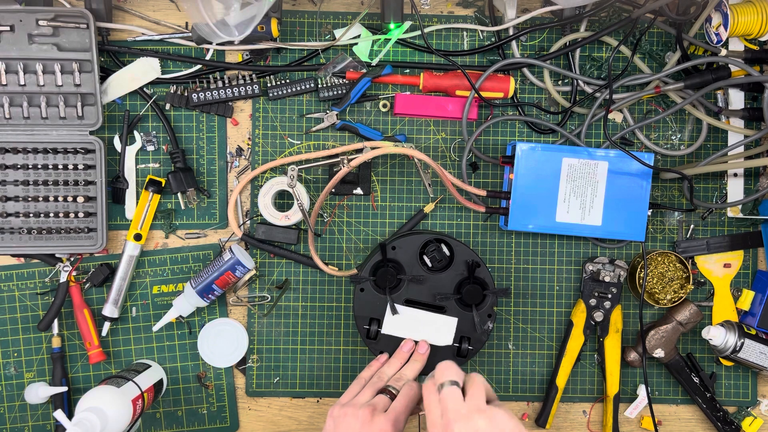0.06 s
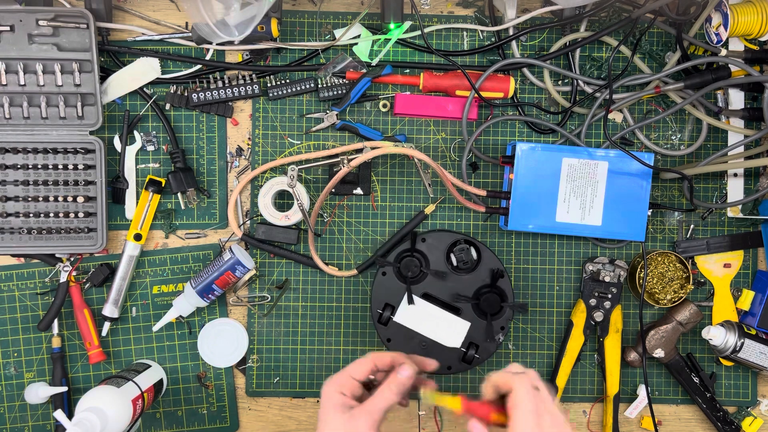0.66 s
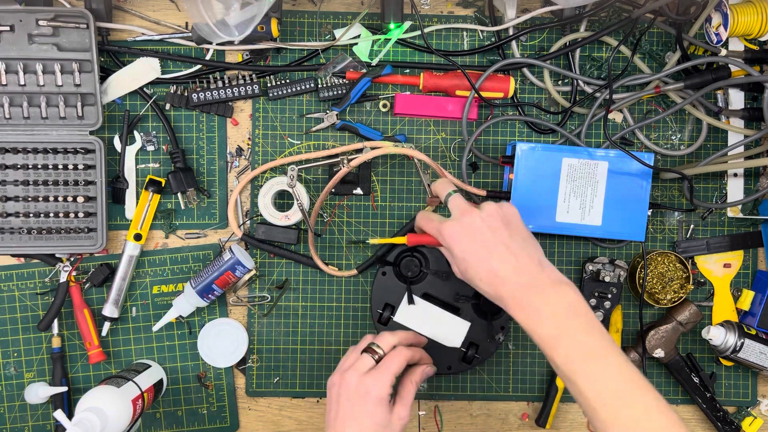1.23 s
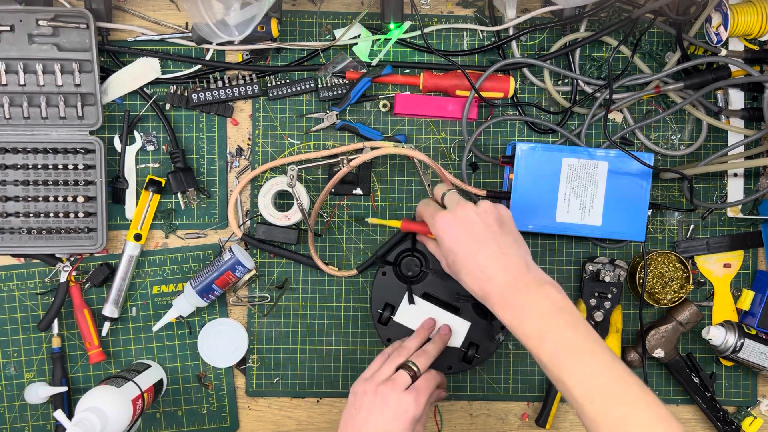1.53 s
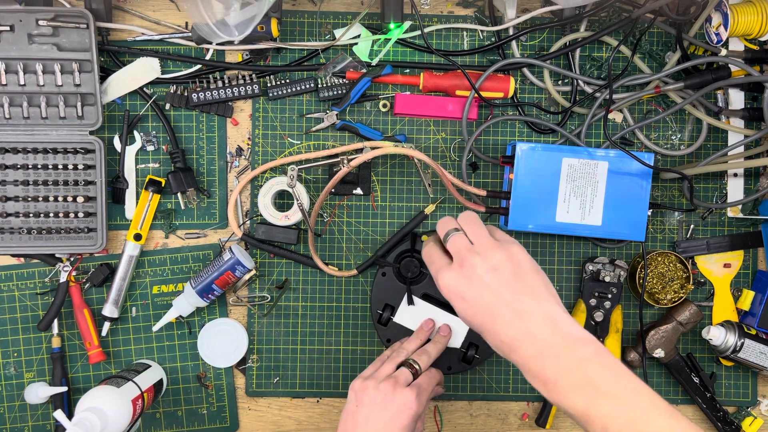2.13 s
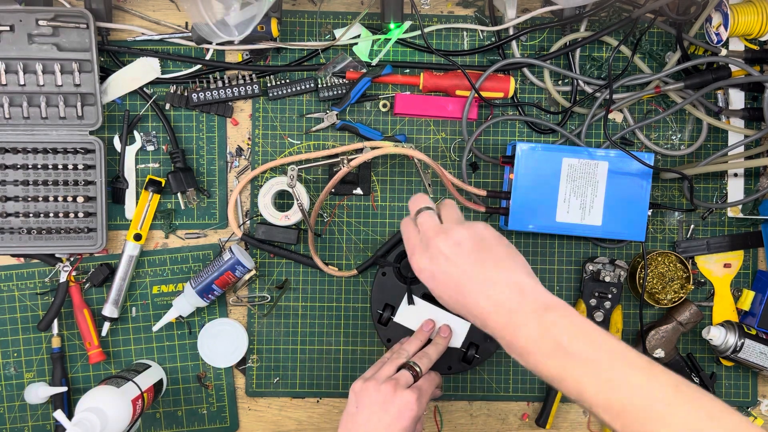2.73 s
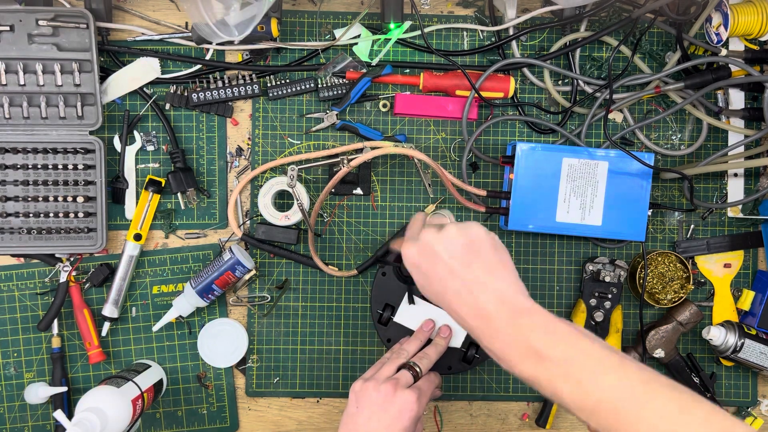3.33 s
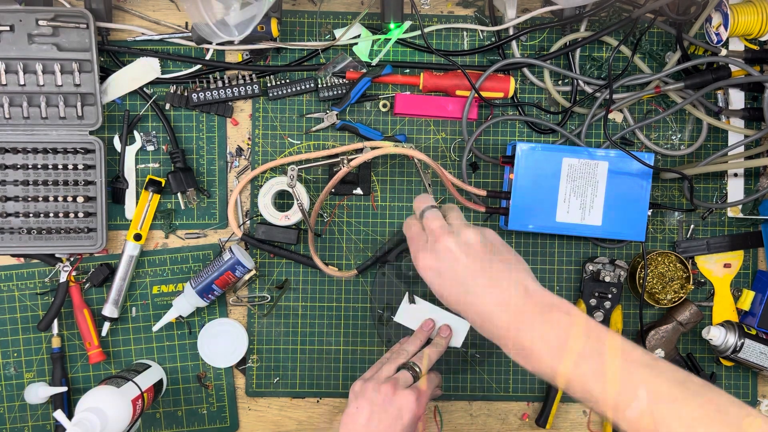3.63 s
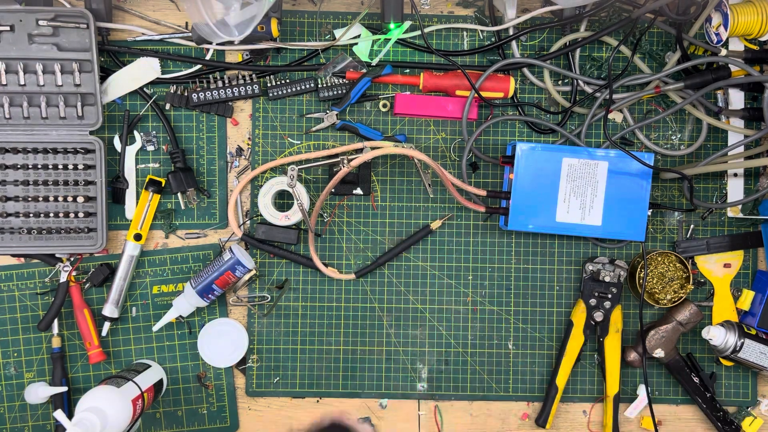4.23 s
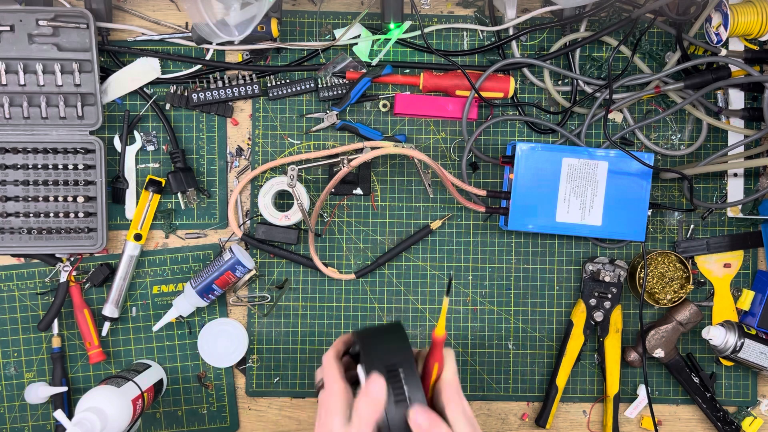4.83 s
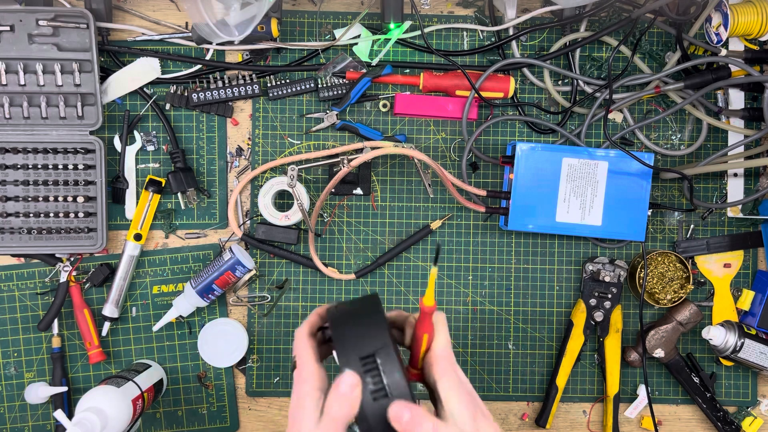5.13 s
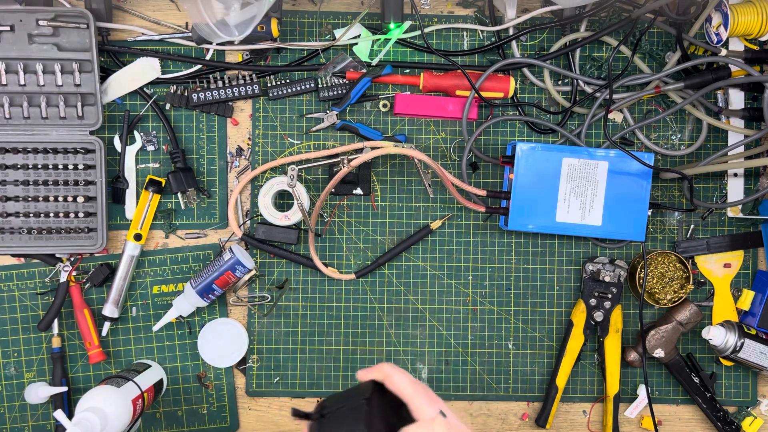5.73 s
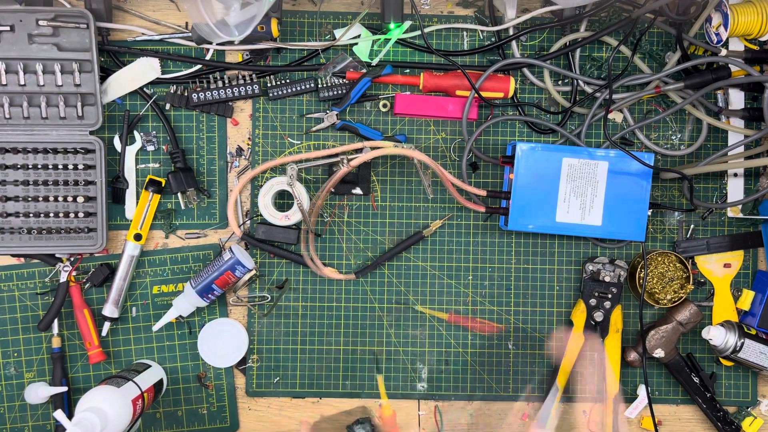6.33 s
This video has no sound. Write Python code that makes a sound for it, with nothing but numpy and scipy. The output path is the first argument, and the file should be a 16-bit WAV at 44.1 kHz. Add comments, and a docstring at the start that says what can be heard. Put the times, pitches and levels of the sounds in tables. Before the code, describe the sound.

A small plastic robot vacuum is handled close by on a workbench, over a quiet rumble of room air. From the start, parts click lightly into the shell while fingers rub and slide on the plastic. A sharp cluster of snaps with a dull bench bump comes at about 0.6 seconds. Lighter clicks follow from 1.3 seconds, building to a firm double snap at 2.5, with more clicks and rubbing until 3.4.

From about 3.6 seconds the unit is turned over, and the air becomes deeper, with a faint hum. Loose parts knock and tumble inside the hollow case in a louder, continuous rattle, strongest between 3.9 and 4.9 seconds, while hands thump softly on it. After 5 seconds the rattle thins into quieter, duller knocks, with one firmer knock near 6.3 and a few small ones up to the end at about 6.5 seconds.

```python
"""In a workshop, over a quiet rumble of air, a small plastic robot vacuum is put together on a bench.
Parts click and snap into its shell, fingers rub and slide on it, and it bumps on the bench.
In a second scene it is turned over: hands thump softly, loose parts knock and rattle in the hollow case,
and the rattle thins out. Each click or knock is a burst of noise that makes the plastic ring;
rubbing and rattling are hundreds of tiny hits a second."""
import sys
import numpy as np
from scipy import signal
from scipy.fft import rfft, irfft
from scipy.io import wavfile

SR = 44100
rng = np.random.default_rng(int(sys.argv[2]) if len(sys.argv) > 2 else 0)


def generate_wav(sig):
    """Save sig (samples, or channels by samples) to the path in sys.argv[1] as 16-bit PCM at SR."""
    pcm = np.round(np.clip(np.atleast_2d(sig).T, -1, 1) * 32767).astype(np.int16)
    wavfile.write(sys.argv[1], SR, pcm)


N = 285327
TIME = np.arange(N) / SR

# Tone of the room air in the fitting scene and in the handling scene: f/Hz, relative level/dB
FITTING_AIR = [(25, -35), (70, -14), (110, -1.5), (240, -5.5), (420, -12.5), (800, -17), (2000, -23),
               (5000, -26), (9500, -30), (15500, -36)]
HANDLING_AIR = [(25, -35), (45, 1), (70, 7), (130, -4.5), (250, -7.5), (600, -11), (2000, -12.5),
                (5000, -38), (10000, -34), (15500, -32)]
# Tones of the room's hum: f/Hz, level/dB
HUM_TONES = [(111, -70.5), (156, -73.5)]

# Overall tone of a hand's thump, skin on plastic, the shell and the held case: f/Hz, relative level/dB
THUMP_TONE = [(90, -18.5), (160, 9.5), (215, -7), (280, -15), (350, -4), (430, 5.5), (600, -73),
              (2000, -82)]
RUB_TONE = [(100, -49), (600, 0), (1000, -4.5), (1400, 9), (2600, -2.5), (4000, 0), (7000, -6),
            (10000, -14), (15500, -52)]
SHELL_TONE = [(60, -7), (150, -12), (300, -9.5), (470, -26.5), (900, -18.5), (1400, -8), (2400, -10),
              (4000, -9.5), (7000, -10.5), (10000, -16), (15500, -26)]
CASE_TONE = [(100, -18), (300, -16.5), (470, -12.5), (620, 5.5), (850, 1.5), (1080, -5.5), (1400, 4.5),
             (3100, -7), (6000, -13), (8000, -23.5), (10000, -34.5), (15500, -36)]
# Pitches at which the shell on the bench and the held case ring: f/Hz, width/Hz, boost/dB
SHELL_RESONANCES = [(160, 9.6, 14.5), (314, 21, 9), (586, 53, 5), (810, 28, 9.5), (1320, 63, 7.5),
                    (1400, 130, -4.5), (1538, 17, 0.5), (1930, 35, 12.5), (2050, 27, -4), (2305, 310, 9),
                    (2640, 104, 9), (2800, 310, 5.5), (2840, 28, 8.5), (3115, 68, 7), (3860, 370, 3),
                    (4500, 44, 8.5), (5620, 69, 10.5), (7100, 420, 3.5), (7600, 150, 3.5), (9250, 687, 2)]
CASE_RESONANCES = [(767, 26, 7.7), (935, 150, 7.5), (1323, 270, 6.3), (1620, 27, 5.6), (1800, 40, 7.6),
                   (2036, 50, 8.2), (2420, 16, 0.67), (2673, 10, 12.2), (3000, 350, 6), (3540, 530, 10.4),
                   (3850, 70, 6.4), (4030, 67, 11), (4410, 260, 12.4), (4650, 160, 6.2), (4940, 190, 4),
                   (5440, 440, 4.6), (6330, 710, 0.58)]

# The case thumps against the hands: t/s, level/dB
HAND_THUMPS = [(4.07, -45), (4.18, -69), (4.23, -51), (4.29, -47.5), (4.495, -56), (4.69, -53),
               (4.835, -52), (5.06, -56), (5.42, -51), (5.58, -52), (5.83, -57), (6.08, -61), (6.255, -59),
               (6.41, -55)]
# The shell bumps on the bench: t/s, level/dB
BENCH_BUMPS = [(0.0, -48), (0.195, -47.5), (0.485, -48.5), (0.535, -48.5), (0.582, -34.5), (0.905, -55.5),
               (1.669, -51.5), (2.233, -51), (2.396, -45.5), (2.433, -42.5), (2.521, -64), (2.542, -62),
               (2.918, -47), (3.05, -57), (3.212, -60), (3.396, -54), (3.443, -47)]
# Strokes across the plastic: middle t/s, length/s, level/dB, f/Hz, filter width/Hz
STROKES = [(0.417, 0.11, -53.5, 2970, 4940), (0.932, .08, -68.5, 7560, 8000),
           (1.97, 0.013, -51, 2920, 4970), (2.32, 0.056, -59.5, 4770, 5000), (2.828, 0.31, -63, 7300, 5000),
           (5.988, 0.2, -62, 3450, 4940), (6.124, 0.051, -63.5, 5500, 9000)]
# How firmly the fingers rub: t/s, level/dB
RUB_LEVELS = [(0, -59.5), (.15, -64), (.42, -58.5), (.62, -73), (.8, -72), (1.2, -84), (1.34, -63),
              (1.5, -64), (1.8, -78), (2.19, -67), (2.4, -62.5), (2.64, -70), (2.93, -58), (3.12, -79),
              (3.24, -54.5), (3.4, -69.5), (3.52, -65.5), (3.7, -58)]
# Small parts tumbling in the case: t/s, hollow level/dB, bright level/dB
RATTLE_LEVELS = [(3.5, -79, -99), (3.66, -62.5, -59.5), (3.78, -61.5, -62), (3.92, -59, -43),
                 (3.995, -49, -70), (4.06, -43, -44), (4.29, -40, -39.5), (4.365, -50, -52),
                 (4.575, -61, -70), (4.63, -48, -85), (4.81, -62, -45.5), (5.0, -63, -56), (5.14, -54, -85),
                 (5.33, -80, -50), (5.52, -54, -61.5), (5.68, -61.5, -68.5), (6.08, -60, -59.5),
                 (6.47, -54.5, -53.5)]

# Parts pressed into the shell, and loose parts hitting the case:
# t/s, strength/dB, hardness/dB, base ring time/s (scaled for each band), the part's own f/Hz
SHELL_CLICKS = [(0.0224, -43.5, 15, .09, 1400), (0.2479, -44.5, 16, 0.02, 4515),
                (0.4501, -48, -10, .07, 1930), (0.4852, -44, 34, 0.16, 5000), (0.5047, -47, 16, .07, 5100),
                (0.5461, -43.5, 50, 0.095, 3840), (0.5624, -38.5, -1, 0.21, 1790),
                (0.5788, -25, -1, 0.066, 1970), (0.5843, -31.5, 44, 0.13, 1860),
                (0.6037, -31, -24, 0.12, 1500), (0.6121, -38, -12, 0.032, 1900),
                (0.6264, -41.5, -1, 0.1, 1660), (0.6387, -39.5, -2, 0.046, 1890),
                (1.2626, -52.5, 2, .13, 2300), (1.293, -44.5, 7, 0.086, 2900),
                (1.4901, -44, 20, 0.076, 1300), (1.5452, -42.5, 12, 0.14, 3080),
                (1.5702, -38.5, 35, 0.063, 4160), (1.6267, -45.5, 13, 0.12, 2470),
                (1.6428, -48, 3, 0.061, 1310), (1.7851, -45.5, 51, 0.084, 8000),
                (1.9717, -50, 12, 0.13, 6400), (2.0476, -55, 10, 0.088, 2800),
                (2.0827, -52.5, 19, .1, 4020), (2.1664, -48.5, 8, 0.1, 2540),
                (2.2021, -44.5, 15, 0.078, 2600), (2.21, -45, 19, 0.082, 5640),
                (2.232, -51.5, -10, .04, 1320), (2.2655, -51, 15, 0.049, 6300),
                (2.3241, -51, 8, 0.12, 3430), (2.3421, -44, 6, .11, 2970), (2.3874, -38.5, 0, 0.034, 2640),
                (2.3966, -39, 21, 0.086, 7100), (2.4084, -50, 2, .06, 2840), (2.4234, -43, 5, 0.052, 1310),
                (2.4349, -35.5, 2.5, 0.065, 3240), (2.4408, -37.5, 25, 0.059, 2020),
                (2.5208, -24.5, 7, 0.039, 906), (2.5402, -23, -7.5, 0.07, 2140),
                (2.6788, -52, 4, 0.49, 2090), (2.86, -47.5, 5, .14, 3840), (2.9141, -46, -4, .07, 2210),
                (2.9766, -54.5, 8, 0.027, 2360), (3.0302, -52, 7, 0.18, 2330),
                (3.052, -39.5, 4, 0.097, 2300), (3.17, -51.5, -2, 0.071, 2670),
                (3.2117, -32, 30, 0.074, 4040), (3.3538, -44, -1, 0.13, 2700),
                (3.4079, -45.5, 31, 0.093, 3670), (3.4368, -42, -3, 0.075, 1320)]
CASE_KNOCKS = [(3.5926, -47, 7.5, 0.18, 904), (3.6995, -50.5, -2.5, 0.18, 935),
               (3.7243, -50, 3, 0.086, 1180), (3.7424, -44.5, 9, 0.33, 3330),
               (3.7733, -49, 12, 0.096, 2980), (3.7958, -41.5, 19, 0.12, 3100),
               (3.826, -34, 6.5, 0.15, 2220), (3.8505, -37.5, 4.5, 0.88, 1280),
               (3.8828, -25.5, 11.5, 0.16, 1450), (3.9096, -31.5, 25, 0.22, 3800),
               (3.9479, -38.5, -3, 0.21, 3250), (4.0077, -28.5, 28, 0.16, 4960),
               (4.017, -29.5, 5.5, 0.56, 4140), (4.0676, -22, 12, 0.12, 3440),
               (4.0781, -30, -21, 0.064, 810), (4.0854, -23.5, 13, 0.08, 6570),
               (4.0969, -23, 18, 0.19, 2770), (4.1732, -26, 7.5, 0.074, 6540),
               (4.1856, -25, 24, 0.14, 3060), (4.199, -35, 16, 0.41, 3580), (4.2318, -30, 0, 0.08, 656),
               (4.2445, -31, 22, 0.35, 3350), (4.2641, -40, 3, 0.21, 3000), (4.2854, -30.5, 15, .21, 2600),
               (4.3321, -41, -8, 0.21, 940), (4.3755, -34.5, 5, 0.3, 6200),
               (4.3897, -17.5, 9.5, 0.15, 3030), (4.4049, -32, 18, 0.89, 1340),
               (4.448, -26, 8, 0.096, 6300), (4.4645, -36, 6, .11, 1830), (4.4859, -42, 17, 0.2, 5700),
               (4.5091, -38, -5, 0.15, 4400), (4.5267, -43, -20, 0.18, 760), (4.5863, -26.5, 14, .23, 2870),
               (4.6346, -33.5, 12, 0.76, 3160), (4.6526, -22.5, 22.5, 0.13, 3470),
               (4.6923, -33.5, 2.5, 0.17, 800), (4.7197, -39, -4, .11, 2560),
               (4.7362, -28.5, 20, 0.31, 3540), (4.7568, -41, 28, .13, 3620), (4.7866, -41, -4, 1, 567),
               (4.8091, -27.5, 33, 0.25, 5200), (4.833, -27, -7, .13, 1140), (4.8449, -28, 7, 0.27, 2410),
               (4.8516, -31, -2, 0.17, 1630), (4.8814, -33.5, -10.5, 0.14, 670),
               (4.8973, -40.5, -9, 0.63, 760), (4.9146, -32, 12.5, 0.33, 2200),
               (4.9225, -43, 19, 0.32, 1820), (4.9411, -38, 5, 0.14, 2030),
               (4.9615, -32.5, 0.5, 0.16, 5800), (4.9811, -36.5, 34, .25, 3830),
               (5.0588, -43.5, -5, 0.55, 690), (5.0938, -45, 23, 0.88, 3900),
               (5.1161, -39.5, 29, 0.17, 3960), (5.149, -44.5, -10, 0.2, 770),
               (5.1677, -41.5, 19, 0.33, 4450), (5.2205, -35.5, 21, 0.29, 3760),
               (5.3001, -39, 10, 0.17, 1050), (5.3213, -37.5, 5, 0.22, 1280),
               (5.4188, -34.5, -5.5, 0.18, 994), (5.4369, -49, -11, .16, 1260),
               (5.4951, -52, -15, 0.28, 990), (5.5284, -45, -18, 0.75, 1300),
               (5.5484, -40.5, -3, 0.32, 1310), (5.5869, -38.5, -18, 0.073, 1170),
               (5.7073, -47, -3.5, 0.3, 630), (5.7259, -44.5, -2.5, 0.2, 1740),
               (5.8301, -36.5, -14.5, 0.18, 750), (5.9545, -52, 0, 1, 726), (6.0653, -45, -13, 0.27, 1270),
               (6.0923, -47.5, 3, 0.57, 860), (6.1476, -44, -5, 0.02, 1480), (6.2217, -49.5, -6, .4, 1240),
               (6.2543, -31, -4.5, 0.14, 763), (6.2694, -42.5, -19, 0.4, 740),
               (6.3213, -39.5, -1.5, 0.23, 2100), (6.3382, -44, -23, 0.18, 710),
               (6.387, -44, -20, 0.22, 710), (6.4343, -40, -11.5, 0.14, 1140),
               (6.4488, -39, -2, 0.17, 1180)]
# Edges of a hit's four pitch bands (thud, body, click, crack): f/Hz
CLICK_BAND_EDGES = [100, 450, 1600, 4500, 16000]
KNOCK_BAND_EDGES = [110, 1100, 2400, 6000, 16000]
# How a hit is shared among those bands, a row each: relative level/dB, share of the hardness added
CLICK_BALANCE = [(-17, -0.029), (-3.5, -0.49), (-0.5, 0.023), (-7.5, 0.25)]
KNOCK_BALANCE = [(0, -1.023), (3, -0.62), (1, -0.073), (-8.5, 0.29)]


def from_db(db):
    """Turn decibels into a number to multiply by."""
    return 10 ** (np.asarray(db) / 20)


def rms_one(x):
    """Scale a sound to an average (rms) size of 1."""
    return x / np.sqrt(np.mean(x ** 2) + 1e-20)


def level_curves(rows):
    """Join a table's levels into loudness curves, silent outside its times."""
    times, *columns = np.transpose(rows)
    return [from_db(np.interp(TIME, times, db, left=-120, right=-120)) for db in columns]


def band(x, low_hz, high_hz):
    """Keep the sound between two frequencies."""
    return signal.sosfilt(signal.butter(3, [low_hz, high_hz], "band", fs=SR, output="sos"), x)


def drift(per_s):
    """A slow random wander, about 1 in size."""
    points = rng.standard_normal(int(N / SR * per_s) + 2)
    return np.interp(TIME * per_s, np.arange(len(points)), points)


def response(tone, resonances=(), size=4096):
    """How an object with this tone and these resonances answers one sharp tap."""
    hz = np.maximum(np.arange(size // 2 + 1) * SR / size, 1)
    tone_hz, tone_db = np.transpose(tone)
    db = np.interp(np.log(hz), np.log(tone_hz), tone_db)
    for centre, width, boost in resonances:
        db = db + boost / (1 + (2 * (hz - centre) / width) ** 2)
    cepstrum = irfft(np.log(from_db(db)))
    cepstrum[1:size // 2] *= 2  # folded forward in time, so nothing rings before it is hit
    cepstrum[size // 2 + 1:] = 0
    return irfft(np.exp(rfft(cepstrum)))[:size // 2]


def through(force, body):
    """Let a force shake an object, given its answer to one tap."""
    return signal.fftconvolve(force, body)[:len(force)]


def fade(t, t60):
    """Die away by 60 dB every t60 seconds."""
    return from_db(-60 * t / t60)


def soft_blows(rows, rise_s, t60):
    """Loudness curve of soft blows that each build up and die away."""
    power = np.zeros(N)
    for start_s, db in rows:
        at = np.searchsorted(TIME, start_s)
        t = TIME[at:at + SR] - start_s
        rise = 1 - np.exp(-(t / rise_s) ** 2)
        power[at:at + len(t)] += (from_db(db) * rise * fade(t, t60)) ** 2
    return np.sqrt(power)


def gritty_noise(per_s, spread_db, t60, smooth_db, size=4000):
    """Tiny random hits of uneven size, each fading fast, over a smooth hiss."""
    happens = rng.random(N) < per_s / SR
    ticks = happens * from_db(spread_db * np.minimum(rng.exponential(1, N), 3))
    tail = fade(np.arange(size) / SR, t60)
    power = np.maximum(through(ticks ** 2, tail ** 2), 0)
    return rms_one(np.sqrt(power / power.mean() + from_db(smooth_db) ** 2) * rng.standard_normal(N))


def shaped_noise(tone):
    """Steady noise with the given tone."""
    return rms_one(through(rng.standard_normal(N), response(tone)))


def workshop_air():
    """The fitting scene's room air crossfades into the handling scene's deeper, humming air."""
    crossfade = np.interp(TIME, (3.74, 4.03), [0, 1])
    fitting_air = from_db(-64.5) * shaped_noise(FITTING_AIR)
    handling_air = from_db(-63.5) * shaped_noise(HANDLING_AIR)
    hum = np.zeros(N)
    for hz, db in HUM_TONES:
        loudness = np.sqrt(2) * from_db(db + 3.5 * drift(per_s=12.0))
        hum += loudness * np.sin(2 * np.pi * hz * TIME + 1.6 * drift(per_s=9.9))
    return np.sqrt(1 - crossfade) * fitting_air + np.sqrt(crossfade) * (handling_air + hum)


def hand_thumps():
    """Palms and fingers thump softly on the case as it is turned."""
    return soft_blows(HAND_THUMPS, rise_s=0.012, t60=0.22) * shaped_noise(THUMP_TONE)


def sliding_strokes():
    """A finger or part slides over plastic: a gritty hiss swells and fades."""
    out = np.zeros(N)
    friction = gritty_noise(per_s=450, spread_db=-2, t60=0.021, smooth_db=0)
    for middle, length, level_db, hz, width in STROKES:
        during = np.abs(TIME - middle) < length / 2
        swell = np.cos(np.pi * (TIME[during] - middle) / length)
        peak = signal.iirpeak(hz, hz / width, fs=SR)
        hiss = signal.lfilter(*peak, signal.lfilter(*peak, friction[during]))
        out[during] += from_db(level_db) * swell * rms_one(hiss)
    return out


def bench_bumps(friction):
    """The bench thuds when the shell bumps it and rumbles when the shell is rubbed."""
    rub, = level_curves(RUB_LEVELS)
    rumble = from_db(-30.5) * rub ** 0.55  # swings less than the rubbing does
    blows = soft_blows(BENCH_BUMPS, rise_s=0.0033, t60=0.14)
    shell = through(friction, response(SHELL_TONE, SHELL_RESONANCES))
    thuds = np.hypot(blows, rumble) * rms_one(band(shell, 123, 360))
    return band(thuds, 96, 450)  # keep each bump a dull, low thud


def finger_rubbing(friction):
    """Skin drags over the shell and makes it ring."""
    rub, = level_curves(RUB_LEVELS)
    shell = through(friction, response(RUB_TONE, SHELL_RESONANCES))
    return rub * rms_one(band(shell, 650, 10000))


def small_parts_rattle():
    """Small parts tumble in the case, giving a hollow rattle and a bright one."""
    hollow, bright = level_curves(RATTLE_LEVELS)
    tumbling = gritty_noise(per_s=300, spread_db=8.5, t60=0.042, smooth_db=-3)
    case = through(tumbling, response(CASE_TONE, CASE_RESONANCES))
    return hollow * rms_one(band(case, 130, 1140)) + bright * rms_one(band(case, 1000, 19000))


def band_levels(balance, strength_db, hardness_db, favour_db):
    """Share a hit's strength among the bands: harder hits give more to the high ones."""
    base_db, share = np.transpose(balance)
    db = base_db + share * hardness_db + favour_db
    return strength_db + db - 10 * np.log10(np.sum(from_db(db) ** 2))


def plastic_hits(hits, balance, edges, tone, resonances, *, part_q, part_db, part_growth, favour_db,
                 rise_s, snap_db, crack_t60, ring_db, ring_scale, chatter_db,
                 treble_from_db, treble_slope, size=12000):
    """Each hit is a snap, a short crack and a weaker chattering ring, built in four bands."""
    out, t = np.zeros(N + size), np.arange(size) / SR
    noises = rng.standard_normal((len(hits), 2, size))
    for (start_s, strength_db, hardness_db, t60, hz), (noise, bounces) in zip(hits, noises):
        at = int(start_s * SR)
        holds_pitch = np.diff(1 * (np.array(edges) > hz))  # 1 for the band with the part's pitch
        levels = band_levels(balance, strength_db, hardness_db, favour_db * holds_pitch)
        # The part adds its own resonance, clearer the firmer the hit.
        part = (hz, hz / part_q, part_db * from_db(part_growth * (strength_db + 36)))
        # Only hard hits reach the highest treble; dull ones take longer to build up.
        treble = (13000, 6000, np.clip(treble_slope * (levels[-1] - treble_from_db), -13, 7))
        body = response(tone, list(resonances) + [part, treble])
        dullness = np.clip(0.039 * (levels[0] - levels[2]), 0, 1)
        contact_s = rise_s * (1 + dullness)
        rise = 1 - np.exp(-(t / contact_s) ** 2)
        snap = from_db(snap_db) * (np.arange(size) == int(2 * contact_s * SR))
        # The part keeps bouncing as it settles.
        chatter = from_db(chatter_db * np.interp(t * 190, np.arange(size), bounces))
        for k, level_db in enumerate(levels):
            ring = chatter * from_db(ring_db[k]) * fade(t, t60 * ring_scale[k])
            envelope = rise * np.hypot(fade(t, crack_t60[k]), ring)
            sound = band(through((noise + snap) * envelope, body), edges[k], edges[k + 1])
            # The level is set for the first 8 ms; the ring adds its energy after that.
            energy = np.sum(envelope ** 2) / np.mean(envelope[:int(0.008 * SR)] ** 2)
            out[at:at + size] += sound * np.sqrt(energy / np.sum(sound ** 2)) * from_db(level_db)
    return out[:N]


def fitting_clicks():
    """Parts snap into the shell, which rings briefly on the bench."""
    return plastic_hits(
        SHELL_CLICKS, CLICK_BALANCE, CLICK_BAND_EDGES, SHELL_TONE, SHELL_RESONANCES,
        part_q=7.0, part_db=10, part_growth=0.2, favour_db=2.0,
        rise_s=0.0014, snap_db=12, crack_t60=[0.039, 0.0083, 0.005, 0.016],
        ring_db=[-34, -14, -11.5, -12], ring_scale=[3.8, 0.87, 0.97, 1.27], chatter_db=1.0,
        treble_from_db=-40, treble_slope=0.25)


def loose_part_knocks():
    """Loose parts fall against the hollow case and make it ring."""
    return plastic_hits(
        CASE_KNOCKS, KNOCK_BALANCE, KNOCK_BAND_EDGES, CASE_TONE, CASE_RESONANCES,
        part_q=6.7, part_db=9, part_growth=0.037, favour_db=3.5,
        rise_s=0.0021, snap_db=10.5, crack_t60=[0.014, 0.0071, 0.011, 0.012],
        ring_db=[-14.5, -14, -14.5, -14], ring_scale=[0.58, 0.6, 0.59, 0.6], chatter_db=0,
        treble_from_db=-51, treble_slope=0.54)


def scene():
    """Add all the sounds into one channel."""
    clicks = fitting_clicks()
    friction = gritty_noise(per_s=390, spread_db=3.0, t60=0.016, smooth_db=-4.5)
    on_bench = clicks + finger_rubbing(friction) + bench_bumps(friction)
    in_case = loose_part_knocks() + small_parts_rattle()
    return (on_bench + in_case + workshop_air() + sliding_strokes() + hand_thumps())[None]


def record(dry):
    """Cut the treble steeply above 16000 Hz."""
    return signal.sosfilt(signal.ellip(10, .1, 80, 16000, fs=SR, output="sos"), dry)


dry = scene()
out = record(dry)
generate_wav(out)
```